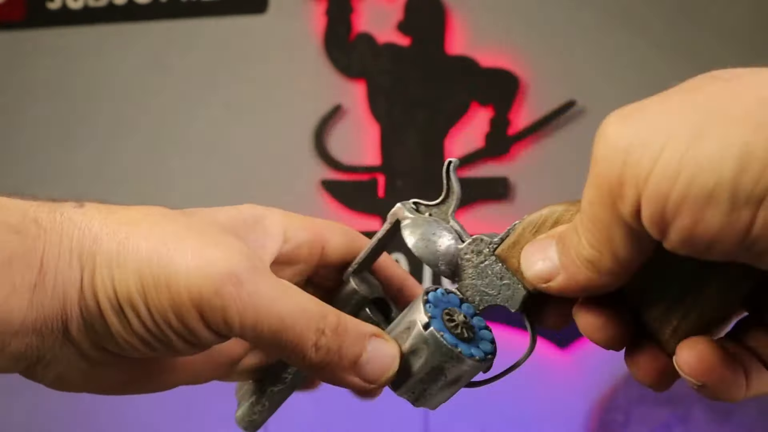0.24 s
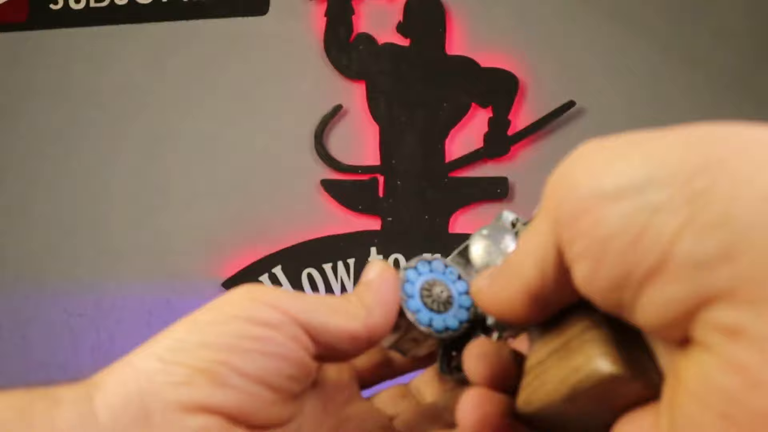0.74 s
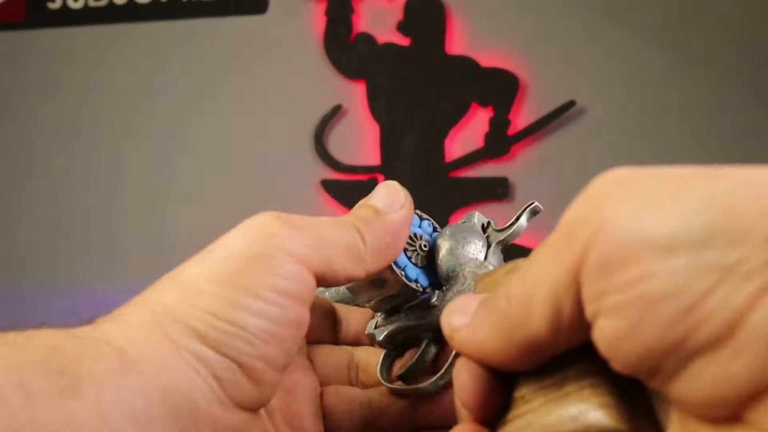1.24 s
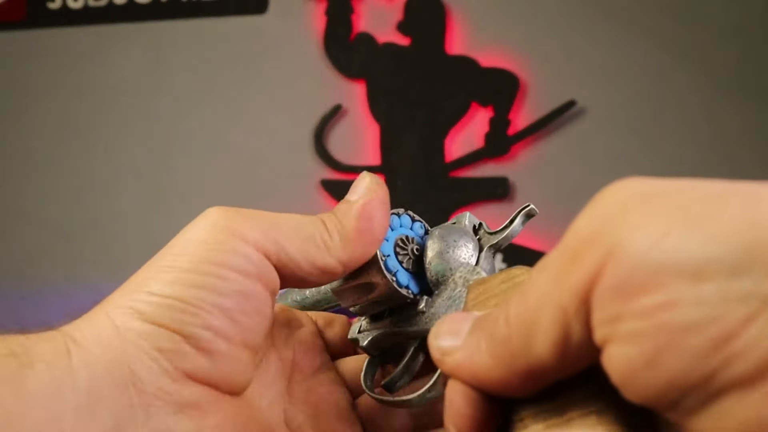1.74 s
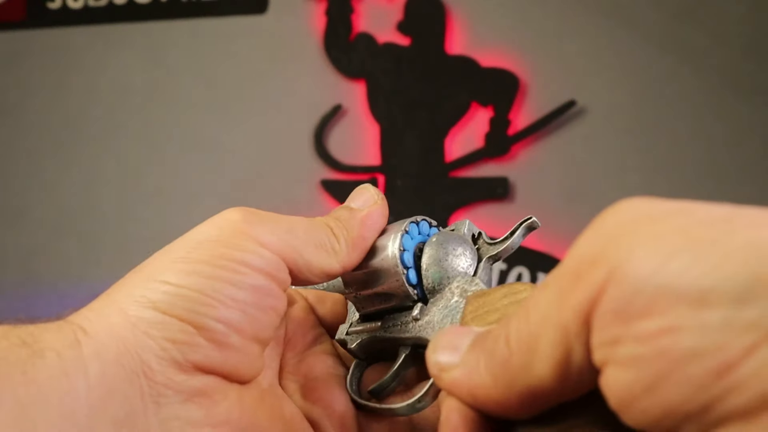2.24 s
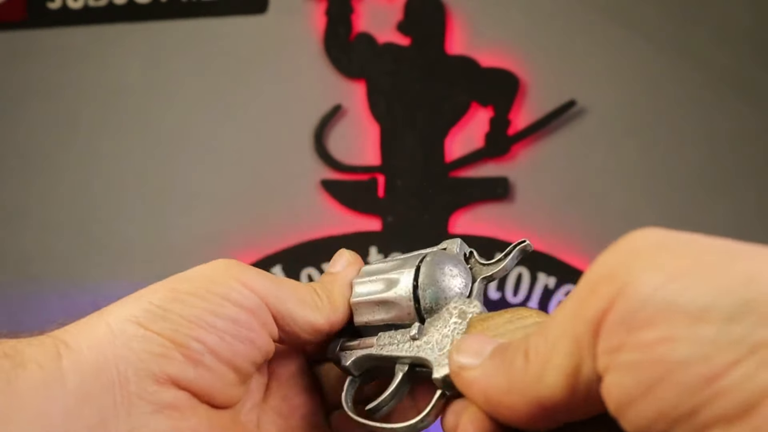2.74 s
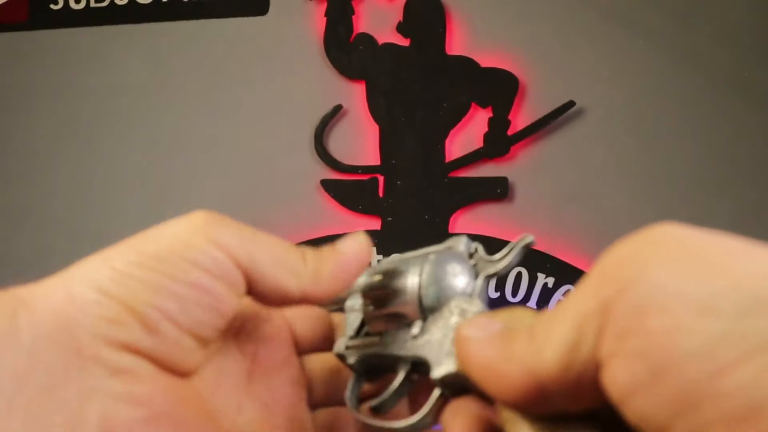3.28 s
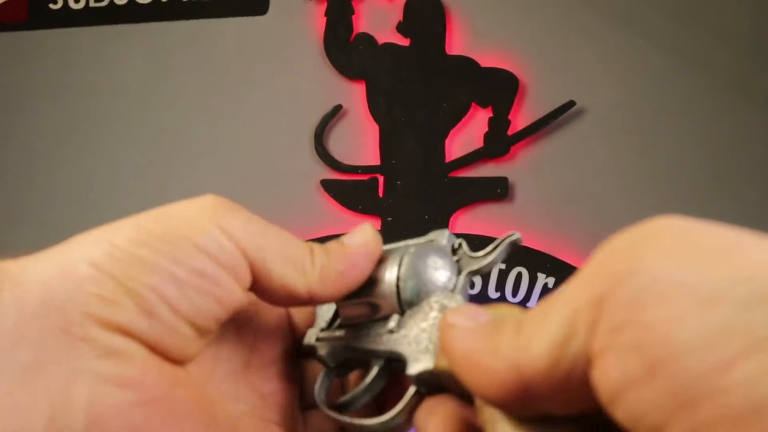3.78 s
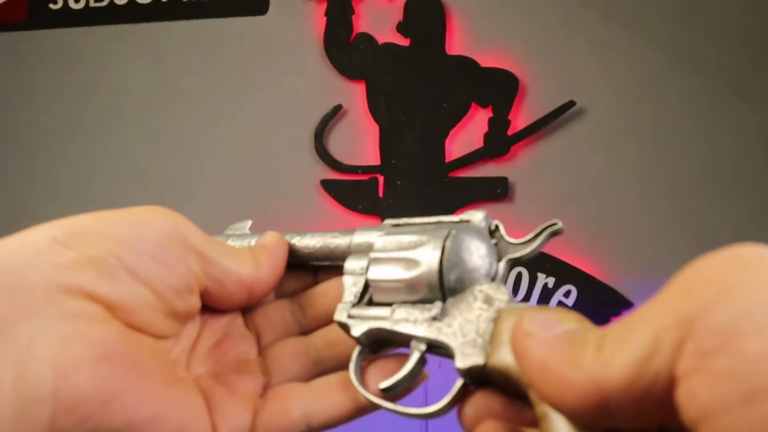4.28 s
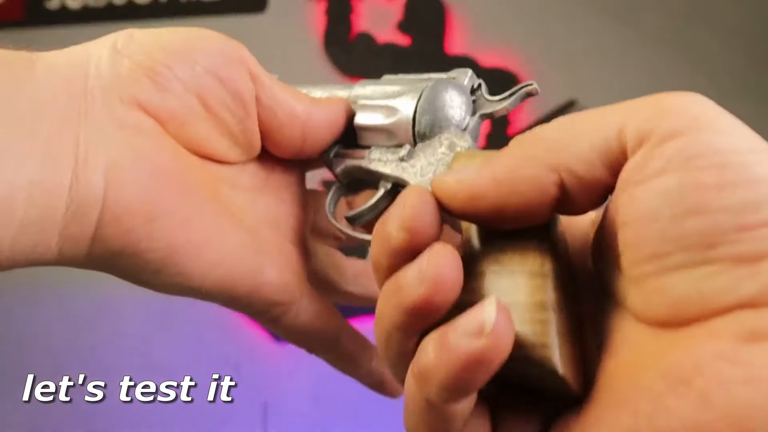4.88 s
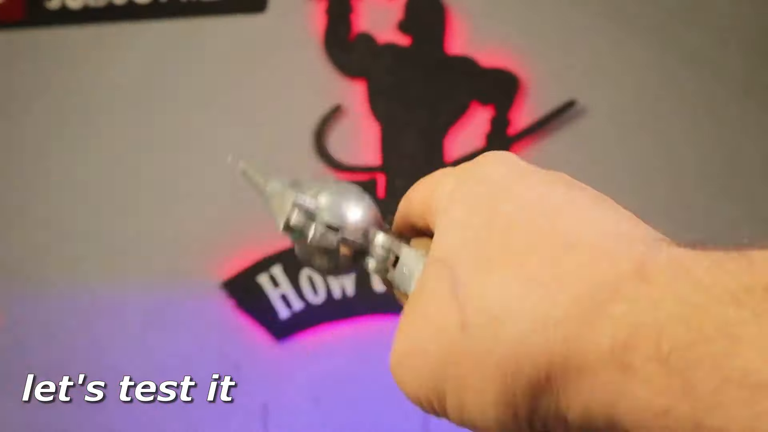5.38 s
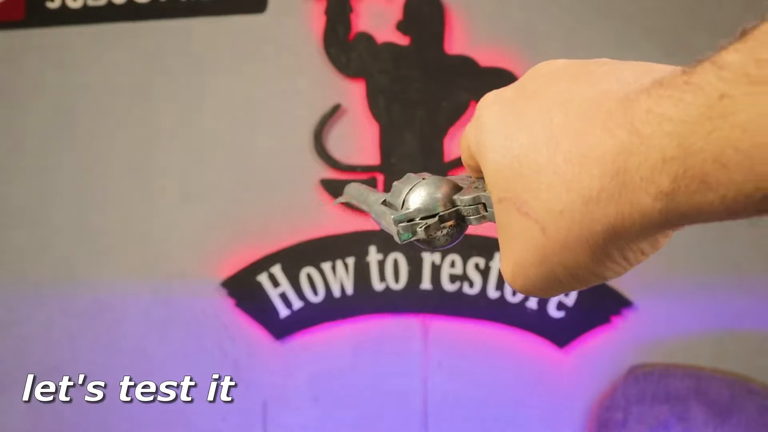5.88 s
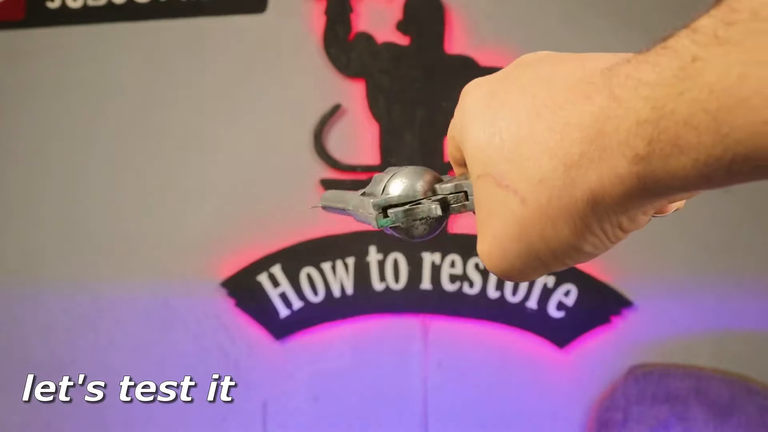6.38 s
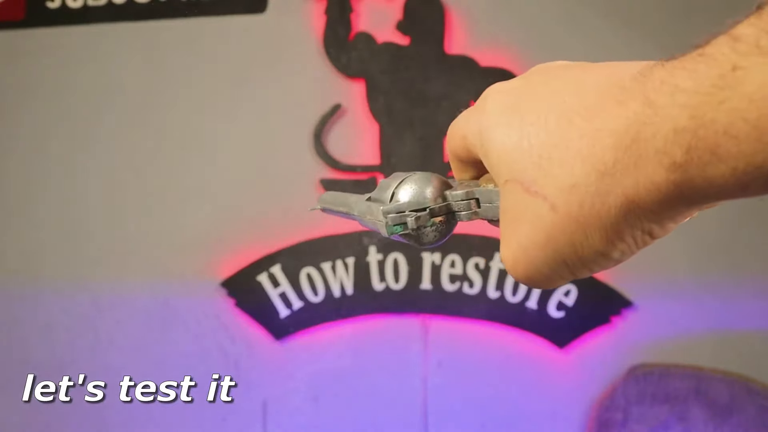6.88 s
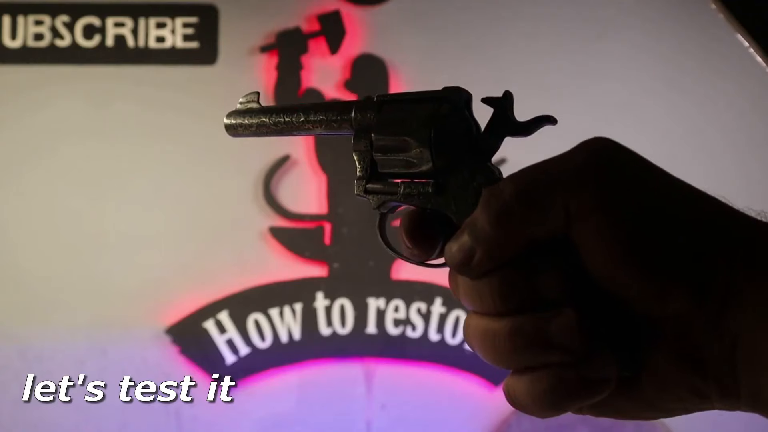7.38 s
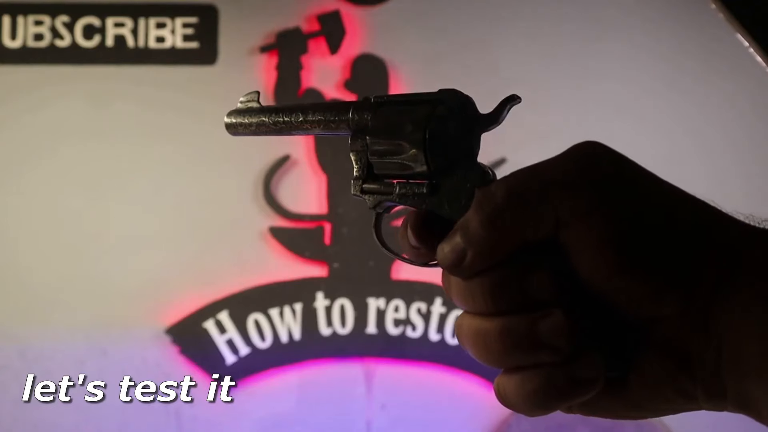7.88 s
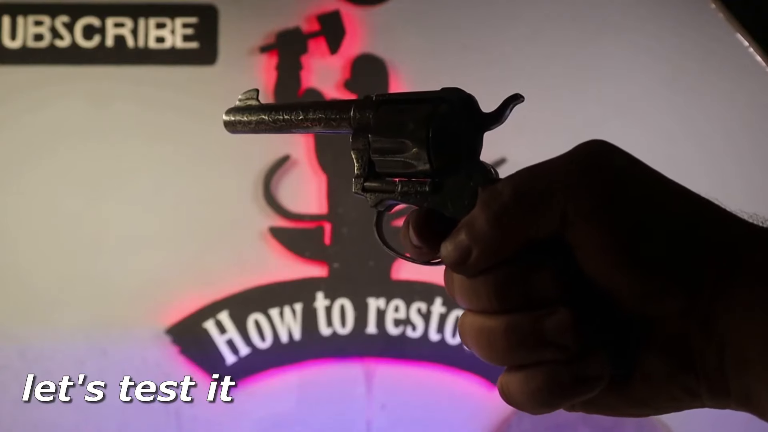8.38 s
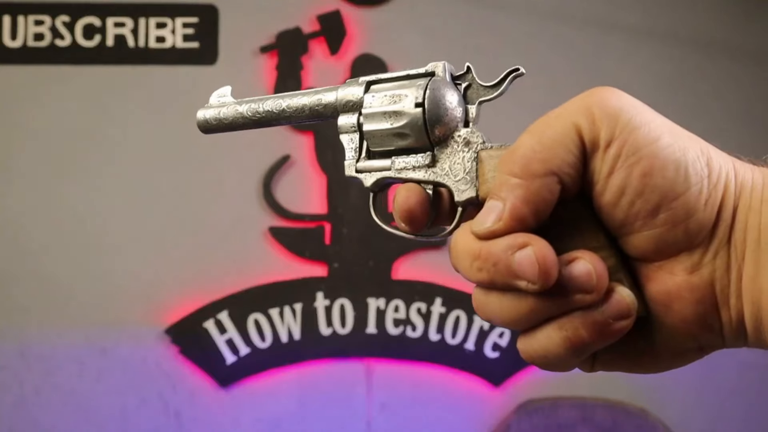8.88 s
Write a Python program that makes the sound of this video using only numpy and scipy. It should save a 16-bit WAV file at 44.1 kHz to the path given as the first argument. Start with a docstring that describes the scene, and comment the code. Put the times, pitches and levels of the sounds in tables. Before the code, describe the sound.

Close metallic clacks of a cap gun being loaded and cocked, a pause, then two loud dry cap bangs ringing through a small room.

```python
"""A die-cast toy cap revolver is loaded, snapped shut and cocked close to the microphone, then fires two caps.
Catches click as noise bursts with decaying sines for the hand-damped frame; the hammer spring pings
and fingers rub the metal as shaped noise. Each cap cracks just after the hammer falls and fills
the small room with a roar of limited, decaying noise. Rumble, hiss and passing drones lie behind."""
import sys
import numpy as np
from scipy import signal
from scipy.fft import rfft, irfft, next_fast_len
from scipy.io import wavfile
from scipy.ndimage import uniform_filter1d

SR = 44100
rng = np.random.default_rng(int(sys.argv[2]) if len(sys.argv) > 2 else 0)


def master(y):
    """Save y as 16-bit WAV."""
    cut = np.clip(np.atleast_2d(y).T, -1, 1)
    pcm = np.round(cut * 32767)  # scale
    wavfile.write(sys.argv[1], SR, pcm.astype(np.int16))


N = 402633
TIME = np.arange(N) / SR
AGE = TIME[:SR // 2]  # half a second for the room's decay
HIT = 6144  # samples in one blow
CASTING_RIPPLE_DB = 4

# modes of the hand-damped frame: f/Hz, level/dB, t60/s
FRAME_MODES = [(1200, -9, 0.034), (1570, -4.5, 0.054), (1720, -5, 0.048), (2435, 6.5, 0.058),
               (2610, -3, 0.034), (3280, -2.5, 0.071), (3430, -13.5, .04), (4145, 7, .04), (5310, 1, 0.067),
               (6500, -9, 0.043), (8600, -16.5, .035), (8620, -9.5, .04), (8160, -14, .04),
               (11490, -14.5, .03)]
# crack of metal on metal: f/Hz, relative level/dB per Hz
CONTACT_COLOUR = [(60, -32.5), (250, -26), (480, -9), (900, -16.5), (1500, -3.5), (2050, -7), (2600, 0.5),
                  (4700, -5), (8500, -2), (10000, -13.5), (13000, -11.5), (15500, -16.5)]


def action():
    """The gun's mechanism up close: parts strike the frame and the hammer spring rings."""
    return clicks() + spring_pings()


def clicks():
    """Catches, cylinder and hammer snap home one after another."""
    # blows: t/s, level/dB, bass/dB, treble/dB, struck part f/Hz, its resonance/dB
    blows = [(.484, -54, 21, -4.5, 4100, 6), (0.7423, -38.5, 9, -8, 4130, 10),
             (.758, -32.5, -1, -15, 4120, -5), (0.774, -38, 6, -5.5, 2480, 8),
             (.839, -39, 9.5, -2.5, 3950, 1.5), (1.164, -48.5, 5, 17, 4100, 7),
             (1.494, -14.5, -4, -4.5, 1567, 9.5), (1.5011, -18.5, 6, 3, 2250, 3),
             (1.529, -35, -2.5, -17, 4240, 7), (1.623, -44, 7.5, -10, 2477, 6),
             (1.8771, -8, 1.5, 1.5, 2610, 11), (1.881, -8, -6, 5, 1580, 13),
             (1.887, -14.5, 0, 1, 8600, -1.5), (2.233, -36, -2, -1, 3230, 17),
             (2.249, -11.5, -5.5, -5.5, 2646, 11), (2.733, -39.5, -1, -20, 3140, 8),
             (2.741, -40.5, -4, -18, 3120, 8), (2.758, -35, -9, -10.5, 3160, 15),
             (2.989, -52.5, -7, -20.5, 2700, 11.5), (3.052, -30.5, -4.5, -7, 3280, 14.5),
             (3.0926, -28, -5, -16.5, 2500, 3.5), (3.1076, -21.5, -30, 1.5, 3190, 15),
             (3.1291, -31.5, -6, 2, 3140, 15), (4.235, -51.5, -1, 2.5, 3110, -3),
             (4.494, -48, -4, -16, 2810, 0), (4.5131, -43, -4.5, -20, 2900, 1),
             (5.1915, -21, -5, 6.5, 5550, 13), (5.192, -32.5, 2, 2, 1815, 25.5),
             (5.711, -47.5, 15, -25.5, 2050, 13), (6.258, -49, -9.5, 8, 7540, 3),
             (6.305, -51, 9, -2, 2410, 13), (8.0276, -41.5, 2, 17, 8800, 1), (8.036, -44, -8, 17, 7500, 0),
             (8.048, -47.5, 3, 13, 2630, 1)]
    out = np.zeros(N)
    for start, *strike in blows:
        add(out, start - HIT / SR, blow(*strike))
    return out


def blow(db, bass_db, treble_db, part_hz, part_db, ring_db=-15, part_ring_db=-20, part_t60=0.041, rise_s=.025):
    """One part snaps home: a brief swell, then a crack and the ring of the part and the frame."""
    tone = dict(bass_db=bass_db, treble_db=treble_db, peak_hz=part_hz, peak_db=part_db,
                ripple_db=CASTING_RIPPLE_DB)
    # a firm blow seats at once and a light one chatters: t60 doubles for every 33 dB of weaker level
    firm_db, firm_t60_s, chatter_db = -15, 0.017, 33
    t60 = firm_t60_s * 2 ** ((firm_db - db) / chatter_db)
    # a longer contact feeds more into the part's own note
    part_gain = undb(part_ring_db + part_db / 2) * np.sqrt(t60 / .02)
    part = part_gain * np.sin(2 * np.pi * part_hz * TIME[:HIT]) * fade(part_t60)
    crack = burst(CONTACT_COLOUR, t60, **tone)
    hit = crack + part + undb(ring_db) * ring(FRAME_MODES, treble_db)
    lead_in = undb(-15.5) * swell(CONTACT_COLOUR, rise_s, **tone)
    return undb(db) * np.concatenate([lead_in, hit])


def spring_pings(pluck_db=-5):
    """The hammer spring is plucked: a short contact burst starts its decaying modes."""
    # plucks: t/s, level/dB, pitch ratio, treble/dB, ring length ratio
    plucks = [(5.111, -55.5, 1.02, -8, 1.8), (5.126, -56.5, 1.02, -11, 1.5), (5.885, -60, 1.04, 0, 1.12),
              (7.1848, -40.5, 1, 11.5, 1.73), (8.0304, -44, 1.03, 12.5, 2), (8.144, -41.5, 1.08, -7, 0.72)]
    # modes of the spring before those ratios: f/Hz, level/dB, t60/s
    spring_modes = [(2460, -7, .05), (2580, -9, 0.06), (4830, -3, 0.0307), (6950, -4.5, .026),
                    (7150, -3.5, .032), (9000, 1.5, 0.016), (10920, -9, .04), (12000, -7.5, 0.045),
                    (13800, -11, 0.028)]
    out = np.zeros(N)
    for start, db, pitch, treble_db, length in plucks:
        pluck = burst(CONTACT_COLOUR, 0.022, bass_db=-2, treble_db=11.5, ripple_db=CASTING_RIPPLE_DB)
        ping = ring(spring_modes, treble_db, pitch, length) + undb(pluck_db) * pluck
        add(out, start, undb(db) * ping)
    return out


def caps():
    """The hammer lands, the cap cracks and pushes out a puff of gas, and the room roars."""
    # shots: t/s, crack level/dB, hammer level/dB, roar level/dB, treble/dB, thud/dB re crack
    shots = [(6.0246, -8.5, -9.5, -26.5, -2.5, -19.5), (7.432, -9.5, -1.5, -25.5, 2.5, -8.5)]
    hammer_lead_s = 0.0049  # the hammer lands this long before the cap goes off
    out = np.zeros(N)
    for start, db, hammer_db, roar_db, treble_db, thud_db in shots:
        hammer = burst(CONTACT_COLOUR, .003, bass_db=5.5, treble_db=2.0)
        add(out, start - hammer_lead_s, undb(hammer_db) * hammer)
        cap_crack(out, start, db, treble_db)
        add(out, start + 0.00096, undb(db) * gas_puff(thud_db))
        add(out, start, undb(roar_db) * cap_roar(treble_db))
        add(out, start, sympathetic_hum(treble_db))
    return out


def cap_crack(out, start, db, treble_db, swell_db=-9, rise_s=0.032, barrel_db=-12):
    """A noise swell leads into the cap's crack, which rings the barrel and frame."""
    # crack of the cap: f/Hz, relative level/dB per Hz
    crack_colour = [(40, -8), (300, -7.5), (700, -3.5), (1500, 2), (2300, -5.5), (5000, -7), (7700, -2.5),
                    (10000, -10.5), (15500, -17)]
    # modes of barrel and frame: f/Hz, level/dB, t60/s
    barrel_modes = [(625, 0.5, 0.084), (1334, 1, 0.076), (1532, 1.5, 0.097), (1700, 0.5, .08),
                    (3870, -3.5, 0.11), (5100, -11.5, 0.15), (6900, -3.5, 0.088), (7300, -4, 0.067),
                    (7860, -5, 0.075)]
    tone = dict(treble_db=treble_db, ripple_db=CASTING_RIPPLE_DB)
    lead_in = swell(crack_colour, rise_s, bass_db=-5.0, **tone)
    add(out, start - HIT / SR, undb(db + swell_db) * lead_in)
    crack = burst(crack_colour, 0.042, **tone)
    add(out, start, undb(db) * (crack + undb(barrel_db) * ring(barrel_modes)))


def gas_puff(thud_db, puff_db=-11, puff_hz=82, thud_hz=255):
    """The gas pushes out as a low decaying sine, with a shorter thud above it."""
    puff = undb(puff_db) * np.sin(2 * np.pi * puff_hz * TIME[:HIT]) * fade(0.046)
    thud = undb(thud_db) * np.sin(2 * np.pi * thud_hz * TIME[:HIT]) * fade(0.029)
    return puff + thud


def cap_roar(treble_db, overload_db=26):
    """The room fills with reverberation that a limiter holds flat until it has died down."""
    # the room filled by a cap: f/Hz, relative level/dB per Hz
    roar_colour = [(100, -34.5), (250, -23), (480, -6.5), (700, -6.5), (900, -2), (1400, 0), (2150, -5.5),
                   (3100, -5.5), (4500, -9), (7200, -3.5), (8800, -7.5), (10200, -15.5), (15500, -25.5)]
    roar = limiter(undb(overload_db) * room_tail(roar_colour, treble_db))
    # the reflections take a few hundredths of a second to gather
    return roar * (1 - np.exp(-AGE / 0.018))


def sympathetic_hum(treble_db, sympathy_db=-70):
    """Metal things in the room hum on faintly after a shot as slowly decaying sines."""
    # f/Hz, level/dB, t60/s
    hum_modes = [(800, -2.5, 1.8), (1179, -4.5, 1.5), (1821, -1.5, 2), (2407, -7.5, 1.6), (3085, -7, 1.4)]
    return undb(sympathy_db + treble_db) * ring(hum_modes, size=2 * SR)


def limiter(x, size=900):
    """Gain control that holds the running rms under 1."""
    return x / np.sqrt(1 + uniform_filter1d(x ** 2, size))


def hands(press_db=6, flutter_db=0.5, flutter_rate=64, edge=0.43):
    """Fingers and parts slide over the metal, pressing harder through each stroke; loose parts tick."""
    # strokes over the frame: start t/s, end t/s, level/dB, bass/dB, treble/dB, resonance f/Hz, its level/dB
    strokes = [(0.604, 0.737, -67, -5, -9, 1600, 9), (0.744, 0.778, -45, -7, -2, 4130, 24),
               (1.13, 1.167, -60.5, -3.5, 13, 4200, 5), (1.28, 1.324, -67.5, -15, 13, 8400, 5),
               (4.276, 4.405, -62, -10.5, 6, 2900, 2.5), (4.559, 4.657, -68, -13, -3.5, 2850, 7),
               (4.72, 4.979, -55.5, -0.5, -1.5, 1323, 5.5)]
    # sliding skin: f/Hz, relative level/dB per Hz
    skin_colour = [(200, -36), (500, -10), (800, -1.5), (1350, -4), (1900, -7.5), (2800, -6.5),
                   (4500, -10.5), (8500, -12.5), (11000, -23), (15500, -24)]
    out = np.zeros(N)
    for start, end, db, bass_db, treble_db, frame_hz, frame_db in strokes:
        size = int((end - start) * SR)
        rub = noise(len(AGE), skin_colour, bass_db, treble_db, frame_hz, frame_db)[:size]
        pressure_db = press_db * np.linspace(-.5, .5, size) + flutter_db * walk(flutter_rate, size)
        add(out, start, rub * undb(db + pressure_db) * signal.windows.tukey(size, edge))
    # loose parts tick at random against the frame while the gun is handled
    for start in rng.uniform(.2, 4.7, size=14):
        tick_db = -66 + 2 * rng.standard_normal()
        add(out, start, undb(tick_db) * ring(FRAME_MODES))
    return out


def room(x, wet_db=-16, build_s=0.0023):
    """The walls return a short bright tail."""
    # f/Hz, relative level/dB per Hz
    walls = [(150, -14.5), (600, -4.5), (2600, -7.5), (4200, -6.0), (7500, -4.5), (11000, -3.5), (16000, -6.5)]
    tail = room_tail(walls) * (1 - np.exp(-AGE / build_s))
    return undb(wet_db) * signal.fftconvolve(x, tail / np.sqrt(np.sum(tail ** 2)))[:N]


def room_tail(colour, treble_db=0):
    """Diffuse reverberation: noise split into bands that each decay at their own rate."""
    # f/Hz, t60/s
    room_decay = [(200, 0.27), (1000, 0.24), (3000, 0.25), (7500, 0.23), (11000, 0.21), (16000, .215)]
    size = len(AGE)
    spectrum = rfft(noise(size, colour, treble_db=treble_db, ripple_db=4.5, spacing_hz=60.57))
    hz = np.arange(len(spectrum)) * SR / size
    centres, t60s = np.transpose(room_decay)
    tail = np.zeros(size)
    for share, t60 in zip(np.eye(len(t60s)), t60s):
        tail += irfft(spectrum * np.interp(hz, centres, share), size) * fade(t60, size)
    return tail


def background():
    """A wavering rumble and a smooth hiss, both sinking for a while around each shot, and passing drones."""
    # the background sinks: start t/s, end t/s, level/dB
    lulls = [(6.023, 6.539, -7.5), (7.429, 8.243, -6)]
    lull_db = np.zeros(N)
    for start, end, db in lulls:
        inside = 1. * ((TIME > start) & (TIME < end))
        lull_db += db * uniform_filter1d(inside, size=600)
    return rumble(lull_db) + drones() + hiss(lull_db)


def rumble(lull_db, rumble_db=-2, waver_db=2.0, boom_rate=6):
    """Low noise of drifting level, with room resonances that fade in and out."""
    # rumble level until the first shot, before trim and waver: t/s, level/dB
    rumble_level = [(0.0, -59.5), (1.28, -60.5), (1.85, -65.5), (3.56, -63.5), (3.98, -68), (4.61, -65),
                    (5.4, -60.5), (5.95, -57)]
    # f/Hz, relative level/dB per Hz
    rumble_colour = [(20, -11), (40, -9), (62, -3.5), (90, 0), (130, 0), (200, -7.5), (300, -8), (500, -13),
                     (1000, -18.5), (2500, -30), (8000, -57)]
    # low resonances of the room: f/Hz, level/dB within the rumble
    booms = [(60, -7.5), (128, -8), (172, -11), (200, -9.5), (245, -15), (290, -14.5), (378, -18)]
    low = noise(next_fast_len(N), rumble_colour)[:N] * undb(rumble_db + waver_db * walk(7.2, N))
    for hz, db in booms:
        phase = 2 * np.pi * hz * TIME
        boom = walk(boom_rate, N) * np.sin(phase) + walk(boom_rate, N) * np.cos(phase)
        low = low + undb(db) * boom
    rest_db = -64  # steady setting after the table ends
    level_db = np.interp(TIME, *np.transpose(rumble_level), right=rest_db)
    return low * undb(level_db + .8 * lull_db)  # follows 0.8 of each lull, in dB


def drones():
    """Faint low drones come and go as narrow fluttering bands of noise."""
    # start t/s, end t/s, level/dB, centre f/Hz, width/Hz
    drone_spans = [(.05, 1.31, -65.5, 201.4, 17), (0.824, 1.007, -64, 400, 20), (2.8, 2.93, -61.5, 141, 37),
                   (3.548, 3.781, -64, 155, 21), (5.219, 5.948, -61.5, 366.4, 19),
                   (8.244, 8.383, -57, 161.7, 11.6)]
    out = np.zeros(N)
    for start, end, db, hz, width in drone_spans:
        add(out, start, swish(start, end, db, hz, width, flutter_db=3.5, edge=0.24))
    return out


def swish(start, end, db, hz, width, flutter_db, edge):
    """A stretch of noise in one resonance, with soft ends and a fluttering level."""
    size = int((end - start) * SR)
    f = np.arange(1, SR + 2) / 2
    resonance = 1 / (1 + 1j * (f / hz - hz / f) * hz / width / 2) ** 2
    band = unit(irfft(rfft(rng.standard_normal(2 * SR)) * resonance)[:size])
    return band * undb(db + flutter_db * walk(62.5, size)) * signal.windows.tukey(size, edge)


def hiss(lull_db, hiss_db=-68):
    """Smooth noise that sinks with each lull."""
    # f/Hz, relative level/dB per Hz
    hiss_colour = [(590, -30), (1000, -5), (1680, -5), (2110, -6), (2560, -4), (3180, -5), (15500, -7)]
    return noise(next_fast_len(N), hiss_colour)[:N] * undb(hiss_db + lull_db)


def ring(modes, treble_db=0, pitch=1, length=1, size=HIT):
    """Decaying modes, starting near rms 1; each blow lands on a slightly different spot."""
    hz, db, t60 = np.transpose(modes)
    gain = undb(db + treble_shelf(hz, treble_db) + 1.5 * rng.standard_normal(len(hz)))
    hz = hz * pitch * (1 + 0.0028 * rng.standard_normal(len(hz)))
    total = np.zeros(size)
    for f, g, t in zip(hz, gain, t60):
        total += g * np.sin(2 * np.pi * (f * TIME[:size] + rng.random())) * fade(t * length, size)
    return total / np.sqrt(np.sum(gain ** 2) / 2)


def burst(colour, t60, **tone):
    """A sharp burst of noise that dies away."""
    return noise(HIT, colour, **tone) * fade(t60)


def swell(colour, rise_s, **tone):
    """Noise that grows from nothing in its last moments."""
    return noise(HIT, colour, **tone) * np.maximum(1 - TIME[:HIT][::-1] / rise_s, 0) ** 2


def noise(size, colour, bass_db=0, treble_db=0, peak_hz=3000, peak_db=0, ripple_db=0, q=5, spacing_hz=170):
    """Noise of rms 1 with a given spectrum, two shelves, one resonance and a ripple of crowded small modes."""
    hz = np.arange(size // 2 + 1) * SR / size
    db = read(colour, hz) + bass_db / (1 + (hz / 1900) ** 6) + treble_shelf(hz, treble_db)
    db = db + peak_db / (1 + (2 * q * (hz / peak_hz - 1)) ** 2)
    modes = rng.uniform(-1, 1, size=256)
    db = db + ripple_db * np.interp(hz / spacing_hz, np.arange(len(modes)), modes)
    random_phase = np.exp(2j * np.pi * rng.random(len(hz)))
    return unit(irfft(undb(db) * random_phase, size))


def treble_shelf(hz, db):
    """Harder contact lifts the upper range, in dB."""
    return db * hz ** 3 / (hz ** 3 + 5000 ** 3)


def read(points, hz):
    """Value of (Hz, value) points on a log-frequency axis."""
    f, value = np.transpose(points)
    return np.interp(np.log(np.maximum(hz, 1)), np.log(f), value)


def walk(rate, size):
    """Random drift with a spread near 1, through `rate` random points a second."""
    steps = rng.standard_normal(size=512)
    return np.interp(TIME[:size] * rate, np.arange(len(steps)), steps)


def fade(t60, size=HIT):
    """Exponential decay by 60 dB in t60 seconds."""
    return undb(-60 * TIME[:size] / t60)


def undb(db):
    """Decibels to gain."""
    return 10 ** (np.asarray(db) / 20)


def unit(x):
    """Scale to rms 1."""
    return x / np.sqrt(np.mean(x ** 2))


def add(track, start, sound):
    """Mix a sound in at a time in seconds."""
    i = int(start * SR)
    track[i:i + len(sound)] += sound[:N - i]


def scene():
    """The gun close to the microphone, its room around it and the background behind."""
    rubs = hands()
    # the gun radiates differently towards each wall, so the tail is smoother than the direct sound
    tail = (room(action() + rubs) + room(action() + rubs)) / np.sqrt(2)
    return (action() + caps() + rubs + tail + background())[None]


def record(dry):
    """The recorder rounds the loudest peaks and cuts the top."""
    ceiling, top_hz = .8, 15850
    rounded = ceiling * np.tanh(dry / ceiling)
    low_pass = signal.ellip(10, .2, 70, top_hz, fs=SR, output="sos")
    return signal.sosfilt(low_pass, rounded)


dry = scene()
out = record(dry)
master(out)
```